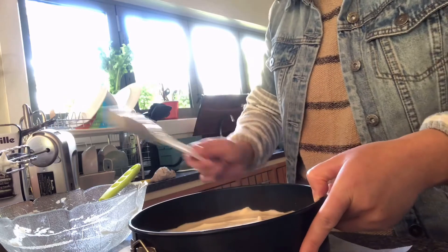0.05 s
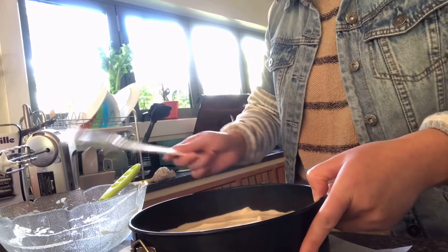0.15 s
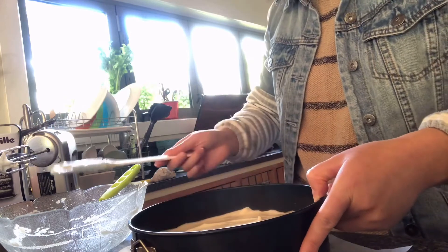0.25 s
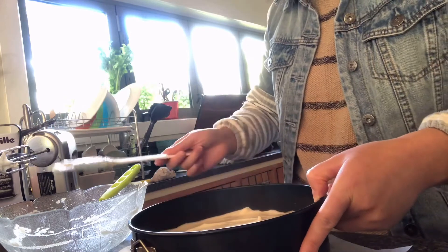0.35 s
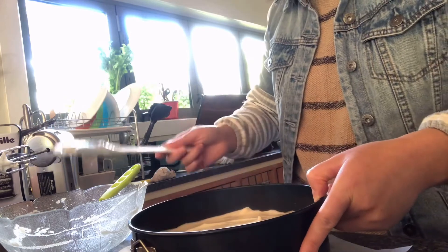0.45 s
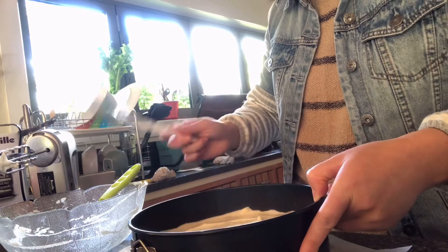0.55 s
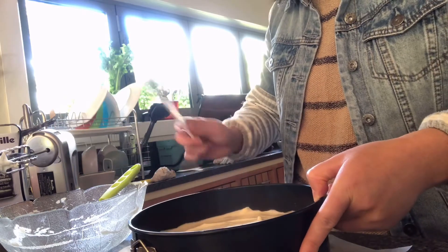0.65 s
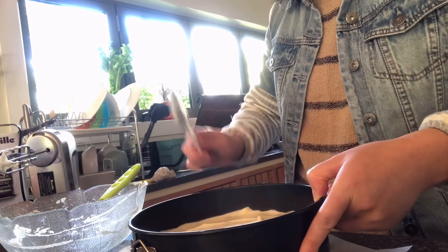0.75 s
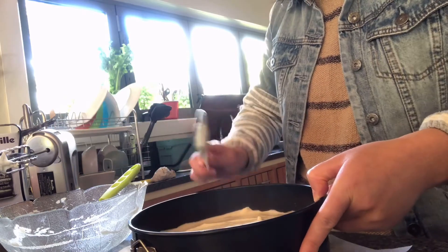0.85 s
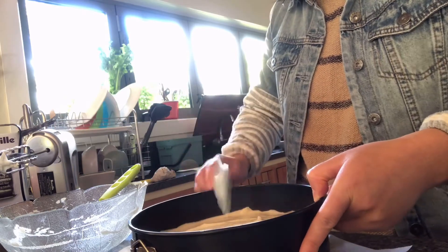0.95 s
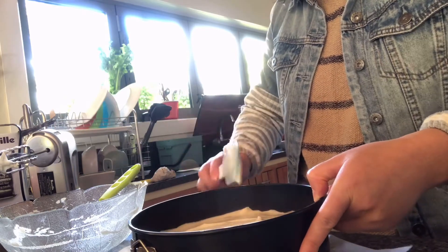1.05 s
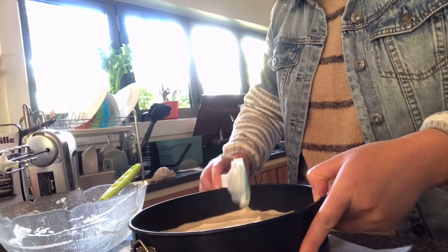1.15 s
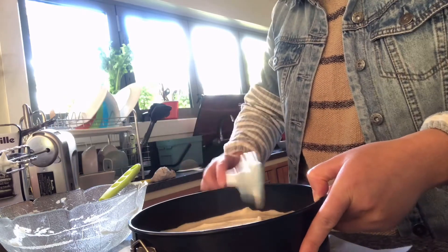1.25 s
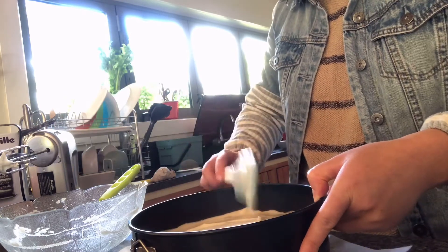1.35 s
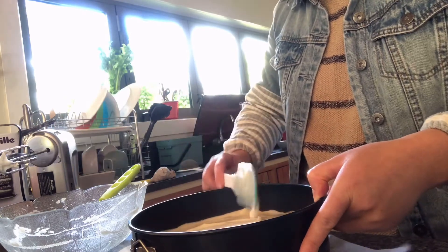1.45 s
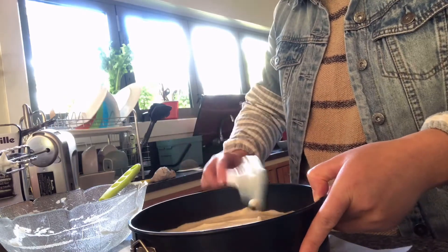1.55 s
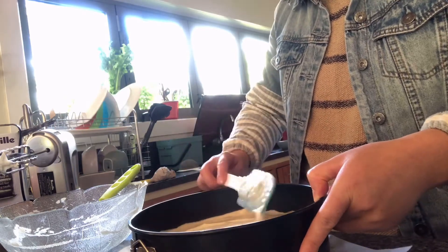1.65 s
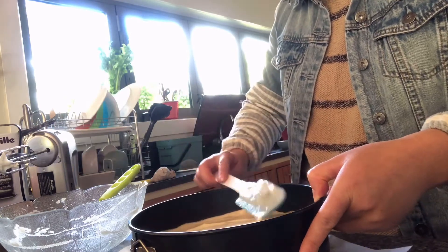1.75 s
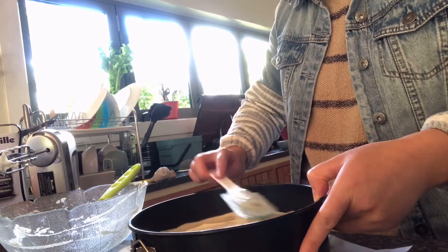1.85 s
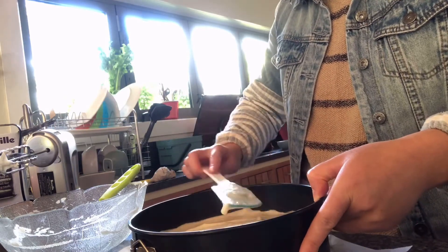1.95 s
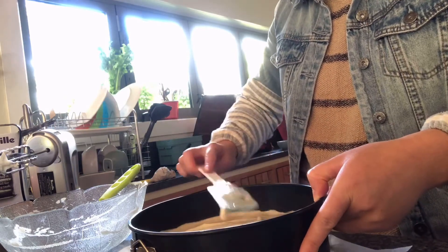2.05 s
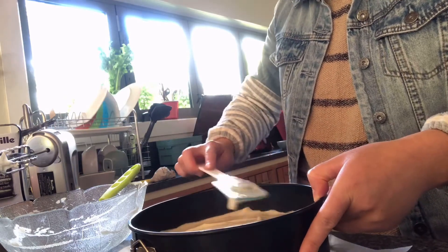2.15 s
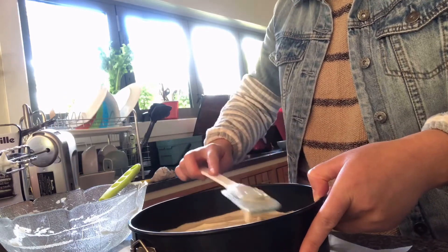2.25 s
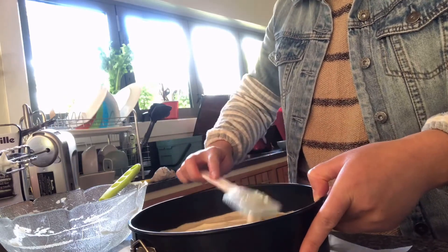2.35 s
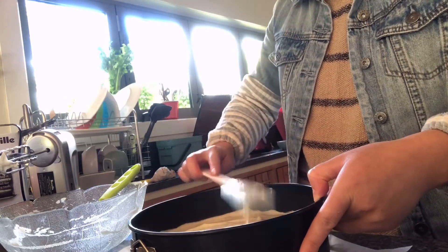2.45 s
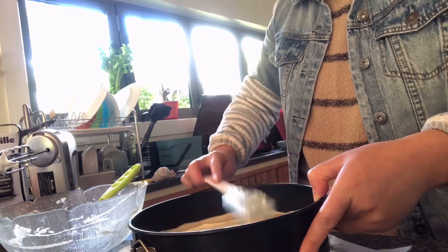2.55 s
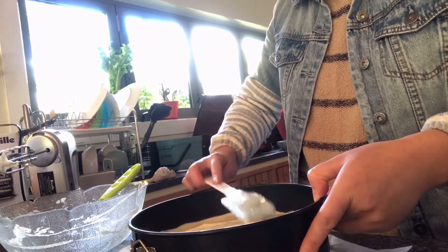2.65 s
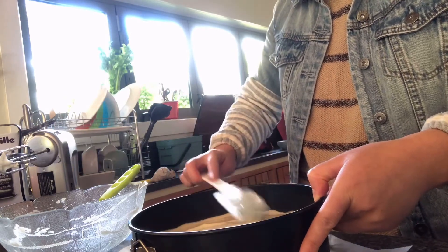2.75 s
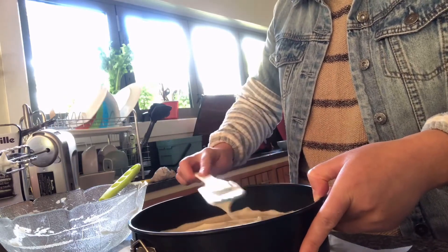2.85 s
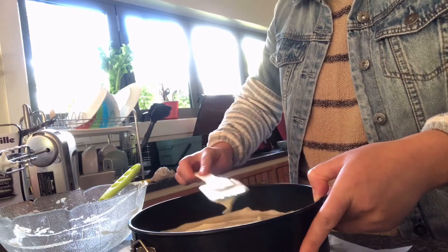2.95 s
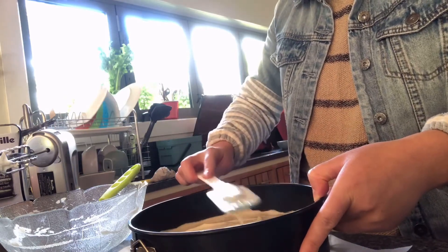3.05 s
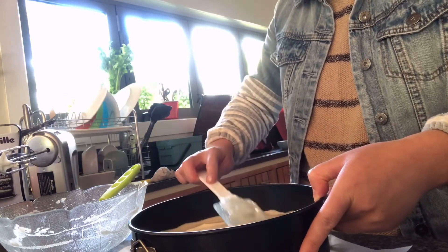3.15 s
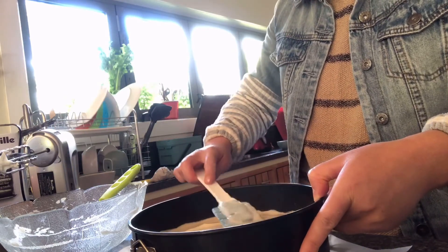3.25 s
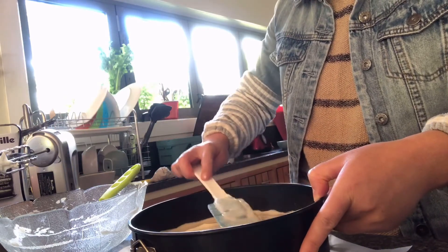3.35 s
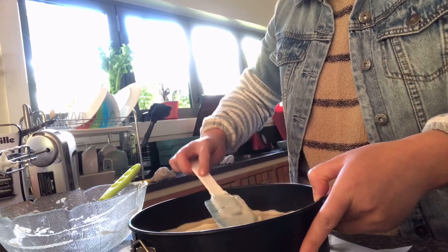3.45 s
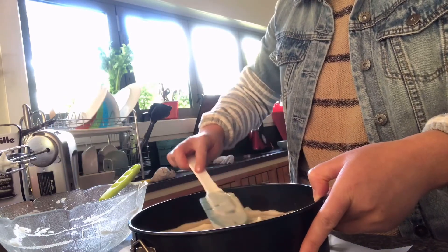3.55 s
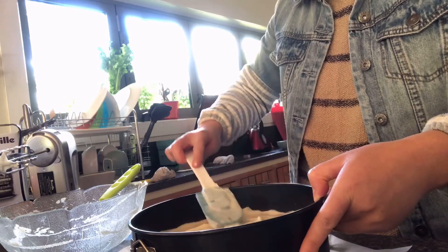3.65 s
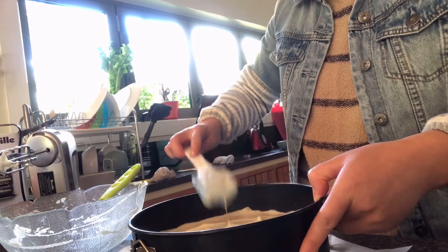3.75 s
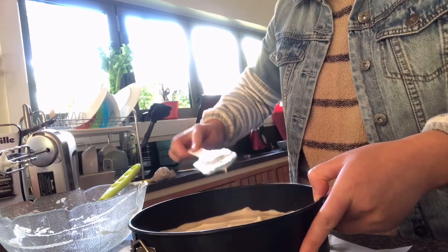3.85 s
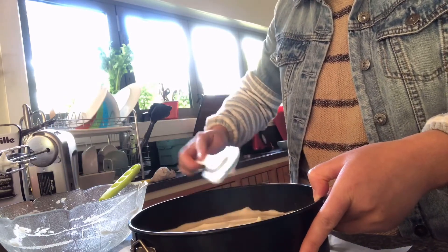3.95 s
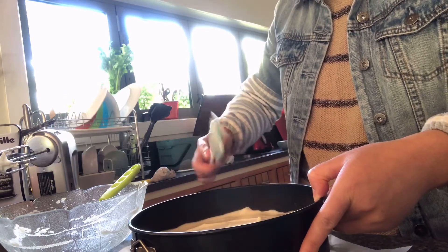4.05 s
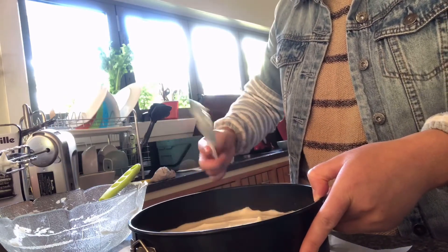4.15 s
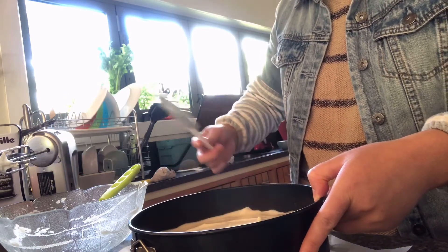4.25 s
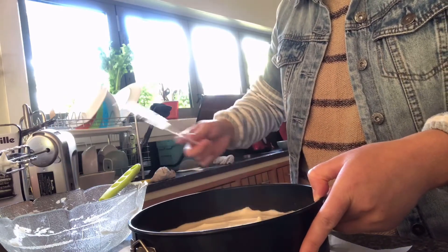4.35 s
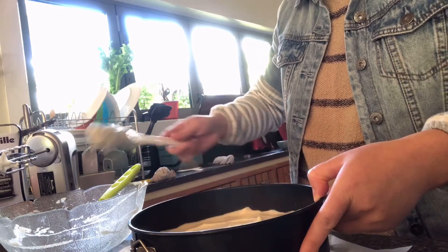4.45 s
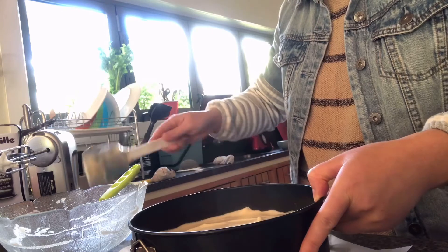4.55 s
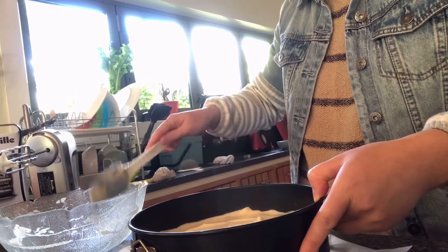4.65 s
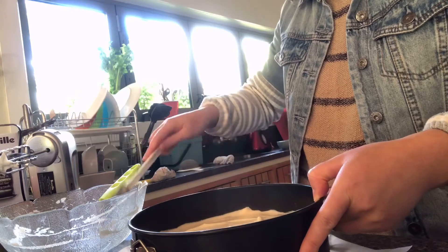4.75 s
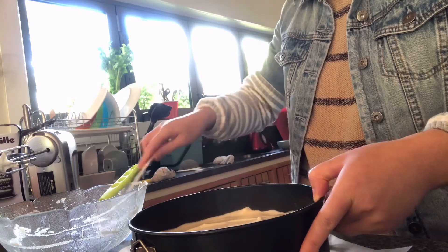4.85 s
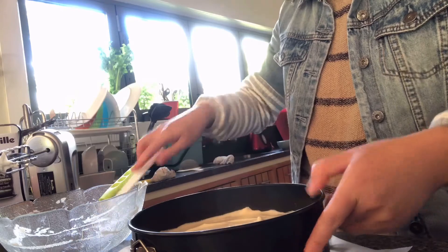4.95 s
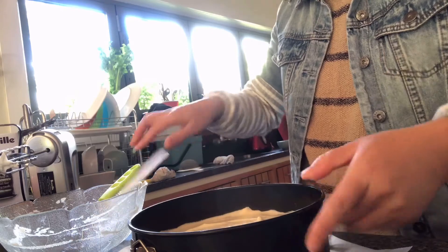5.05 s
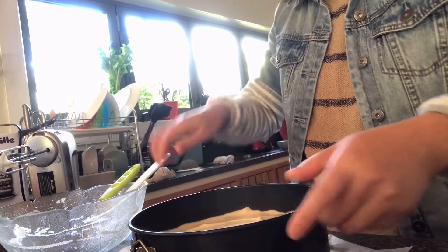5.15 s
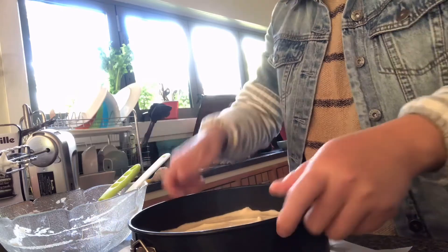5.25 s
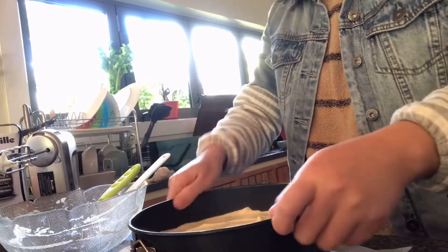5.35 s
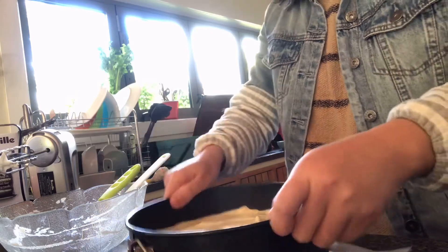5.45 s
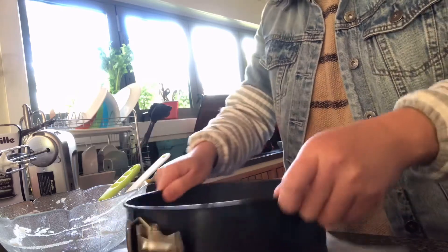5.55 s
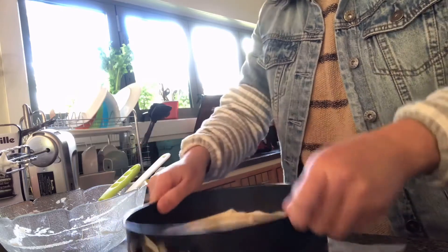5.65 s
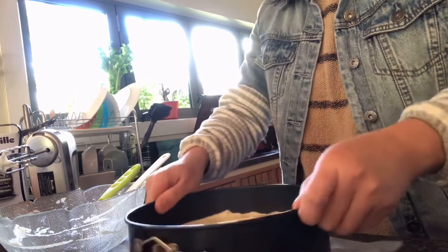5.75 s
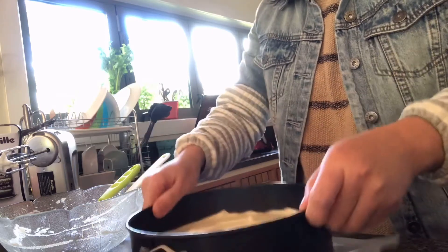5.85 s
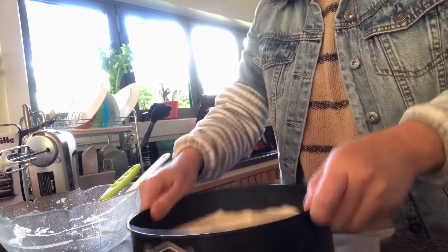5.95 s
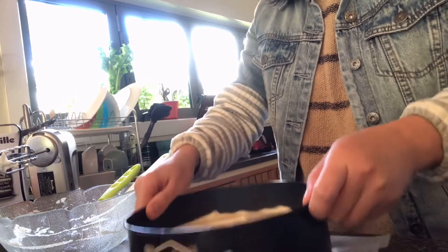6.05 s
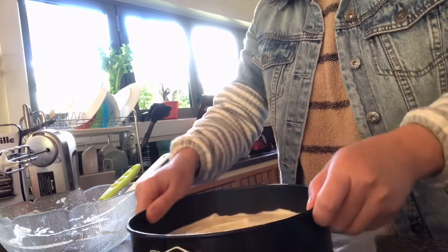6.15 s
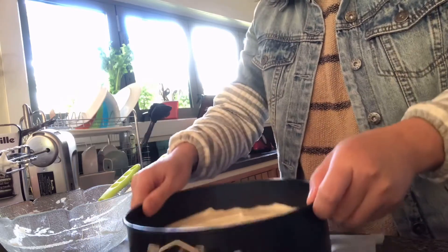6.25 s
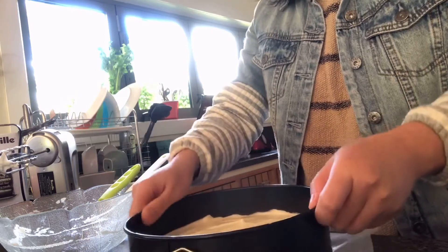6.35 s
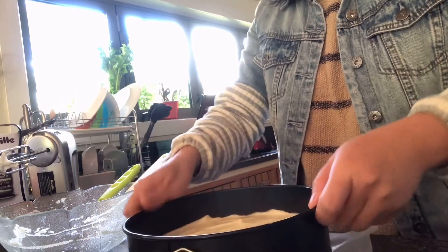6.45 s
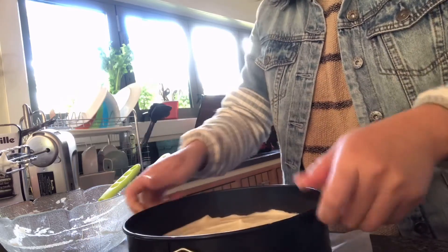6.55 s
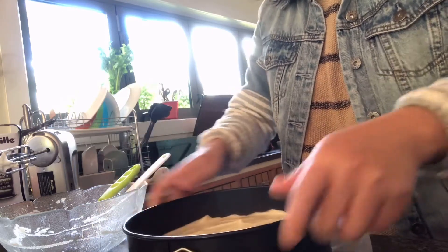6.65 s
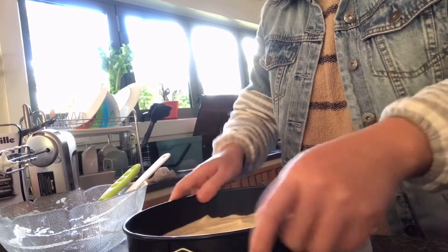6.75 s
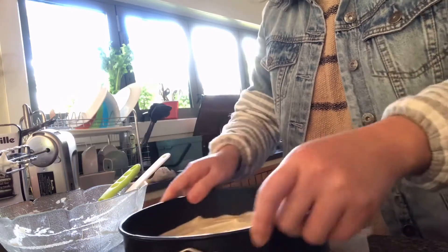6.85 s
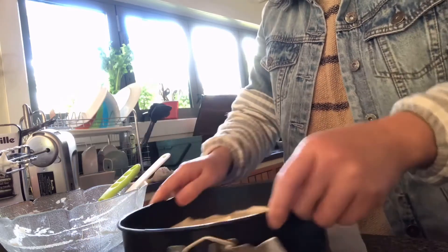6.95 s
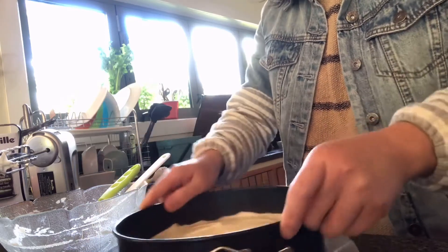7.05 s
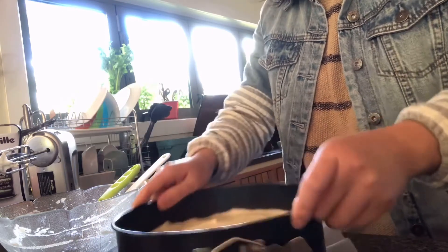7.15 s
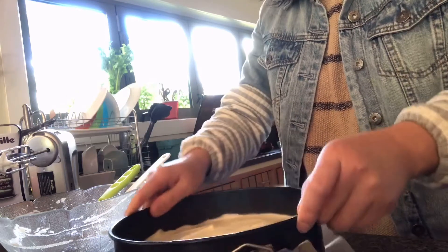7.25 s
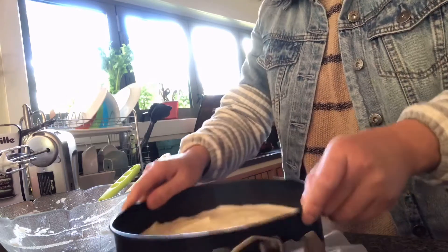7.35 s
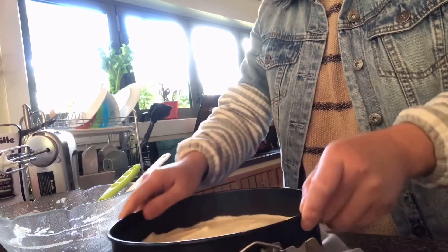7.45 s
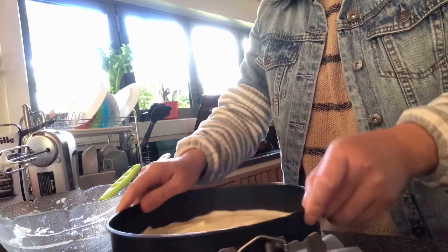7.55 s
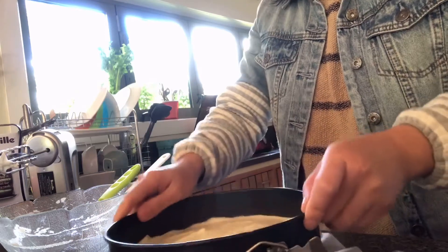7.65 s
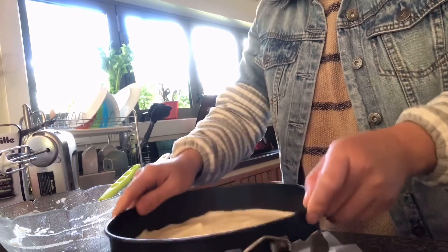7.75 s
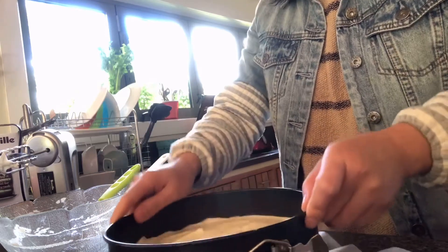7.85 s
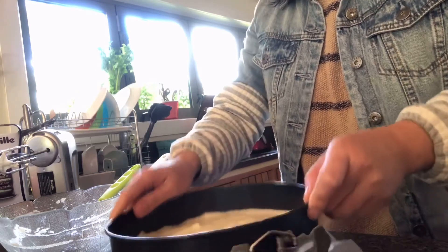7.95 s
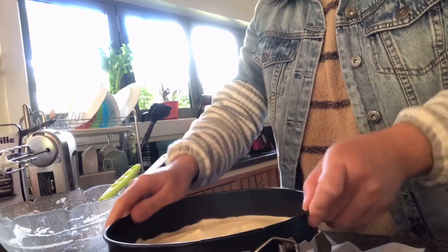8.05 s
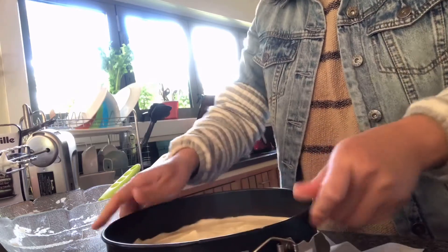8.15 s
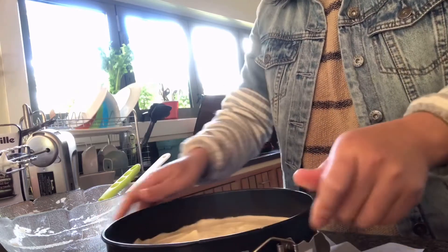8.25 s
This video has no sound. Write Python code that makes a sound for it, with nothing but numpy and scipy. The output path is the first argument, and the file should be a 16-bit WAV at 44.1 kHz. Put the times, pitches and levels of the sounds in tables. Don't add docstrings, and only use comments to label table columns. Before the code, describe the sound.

Five quick spatula taps on a batter-filled metal tin, a clink into a glass bowl, then heavy tin knocks on a worktop with crunching paper.

```python
import sys
import numpy as np
from scipy import signal
from scipy.fft import rfft, irfft, next_fast_len
from scipy.io import wavfile
from scipy.ndimage import uniform_filter1d

SR = 44100
rng = np.random.default_rng(int(sys.argv[2]) if len(sys.argv) > 2 else 0)


def volts_from_decibels(level):
    exponent = np.asarray(level, float) / 20
    return 10 ** exponent


def bounce(signal):
    frames = np.transpose(np.atleast_2d(signal))
    limited = np.clip(frames, -1, 1)
    pcm = np.round(limited * 32767).astype(np.int16)
    wavfile.write(sys.argv[1], SR, pcm)


N = 365588
M = next_fast_len(N)
HZ = np.arange(M // 2 + 1) * SR / M


# (time [s], body peak level [dB], plate level [dB], tick level [dB], hardness [dB per octave])
RIM_TAPS = [
    (0.985, -19.5, -18, -32, 10.5),
    (1.1285, -13.5, -10, -12.5, 2),
    (1.293, -14.5, -14, -15.5, 6.5),
    (1.4456, -11, -4.5, -10, 1),
    (1.5969, -16, -14, -12, 2.5),
]
BLADE_PATS = [
    (2.5455, -27.5, -24, -14, 0),
    (2.666, -32.5, -30, -20, 0),
]
# (frequency [Hz], level [dB], t60 [s])
HELD_BODY_MODES = [(273, 1, .035), (345, 2, 0.025), (386.6, -5, 0.026)]
# (frequency [Hz], level [dB], t60 [s])
RIM_MODES = [(503, -0.5, 0.036), (640, -4, .015), (775, 0.5, 0.016), (920, -2, .015), (1094, -9.5, 0.011),
             (1300, -11, .012), (1570, 1, .014), (1970, -1, .011), (2300, -13, .01), (2750, -20, .008),
             (3350, -24, .007)]
# (frequency [Hz], level [dB], t60 [s])
BLADE_MODES = [(505, -3, .025), (640, -5, .02), (1300, -12, .008), (2300, 0, .009), (2650, 0, .009),
               (3150, -2, .007), (3600, -4, .008)]


def spatula_on_tin():
    taps, contacts = blows(tap_blows(RIM_TAPS), HELD_BODY_MODES, RIM_MODES, thud_db=3.5, body_db=5,
                           knock_db=6.5, tick_db=3.0, small_hz=215, spread=0.012)
    pats, touches = blows(tap_blows(BLADE_PATS), HELD_BODY_MODES, BLADE_MODES, thud_db=3.5, body_db=4.5,
                          knock_db=6, tick_db=4.0, small_hz=200, spread=0.01)
    return bending(taps + pats) + tin_wall(contacts + touches)


def tap_blows(table):
    return [(s, body, -15.5 + 0.75 * body, plate, tick, hard) for s, body, plate, tick, hard in table]


# (time [s], body peak level [dB], thud level [dB], plate level [dB], paper level [dB])
LANDINGS = [(5.69, -17.5, -22.5, -30, -23), (5.826, -8.5, -17, -13, -17), (5.986, -4.5, -13, -13, -16),
            (6.156, -19, -13.5, 1.5, -23.5), (6.35, -6.5, -18.5, -11, -14.5),
            (7.018, -13, -14.5, -18, -25.5), (7.217, -10.5, -12, -21.5, -15), (7.409, -6, -20, -11, -18.5),
            (7.615, -9.5, -17, -6.5, -27.5), (7.811, -6.5, -21, -14.5, -23), (8.009, -20, -14, 1, -18)]
# (time [s], body peak level [dB], plate level [dB])
ROCKS = [(5.698, -28.5, -42), (5.781, -26.5, -50), (5.994, -18, -3.5), (6.169, -9, -32),
         (6.181, -29.5, -31.5), (6.507, -34, -39.5), (6.77, -41.5, -47), (6.815, -34.5, -44),
         (7.032, -9.5, -7.5), (7.051, -21, -30), (7.426, -12, -22), (7.438, -18.5, -26),
         (7.636, -11.5, -14.5), (7.825, -13, -15), (8.02, -8.5, -15)]
# (frequency [Hz], level [dB], t60 [s])
BODY_MODES = [(197, -10, 0.11), (258.6, -1, 0.054), (326, -1.5, 0.023), (377, -1.5, 0.02)]
# (frequency [Hz], level [dB], t60 [s])
BASE_MODES = [(493, -0.5, 0.085), (593.8, 6, 0.024), (794, 0.5, 0.036), (990, -3, 0.023),
              (1110, 0.5, 0.015), (1277, -5.5, 0.0297), (1587, -17, 0.042), (1814, -23, 0.047)]


def tin_on_worktop():
    rows = []
    for s, body, thud, plate, _ in LANDINGS:
        rows.append((s, body, thud, plate, plate, slap_hardness(body, plate)))
    for s, body, plate in ROCKS:
        rows.append((s, body, body - 11, plate, plate - 5, slap_hardness(body, plate)))
    knocks, _ = blows(rows, BODY_MODES, BASE_MODES, thud_db=-0.85, body_db=5.5, knock_db=5.0,
                      tick_db=-9.5, small_hz=196, spread=0.032)
    return bending(knocks)


def slap_hardness(body, plate):
    return 0.5 + 0.21 * (plate - body)


# (frequency [Hz], level [dB], t60 [s])
THUD_MODES = [(64, -20, .05), (85, 1.5, 0.075), (110, 3, 0.072)]
# (frequency [Hz], level [dB], t60 [s])
TICK_MODES = [(2630, -3, .007), (3200, -6, .006), (4150, -3, .007), (4680, -3.5, .007), (5600, -10.5, .008),
              (6050, -3, .012), (6600, -5, .012), (7600, -3.5, .01), (8500, -11, .007),
              (10500, -12, 0.0047)]


def blows(table, body_modes, plate, thud_db, body_db, knock_db, tick_db, small_hz, spread):
    thuds, tin, ticks, contacts = np.zeros((4, N))
    for s, body, thud, knock, tick, hard_db in table:
        add(thuds, s, volts_from_decibels(thud + thud_db) * ring(THUD_MODES, scatter_db=3.5, detune=0.04))
        add(tin, s, volts_from_decibels(body + body_db) * ring(body_modes, scatter_db=4.5, detune=0.03))
        add(tin, s, volts_from_decibels(knock + knock_db) * ring(harder(plate, hard_db), scatter_db=3.0, detune=spread))
        click = ring(TICK_MODES, scatter_db=1.5, detune=spread) + 0.074 * burst(0.0053)
        add(ticks, s, volts_from_decibels(tick + tick_db) * click)
        rebound = ring(TICK_MODES[:2], scatter_db=0.0, detune=0.043)
        add(ticks, s + 0.0075, volts_from_decibels(tick + tick_db - 16.0) * rebound)
        add(contacts, s, volts_from_decibels(tick) * np.ones(1))
    tin = signal.sosfilt(signal.butter(4, small_hz, "high", fs=SR, output="sos"), tin)
    ticks = signal.sosfilt(signal.butter(1, 9000, fs=SR, output="sos"), ticks)
    return thuds + tin + ticks, contacts


def bending(x):
    late_s = 0.01598 / (1 + (HZ / 125) ** 4.93) + 0.003597 / (1 + (HZ / 1500) ** 1.8)
    phase = 2 * np.pi * np.cumsum(late_s) * SR / M
    return irfft(rfft(x, M) * np.exp(-1j * phase), M)[:N]


# (frequency [Hz], width [Hz], level [dB])
WALL_MODES = [(2500, 410, 1), (4000, 450, -5), (5180, 900, -10.5), (6340, 1060, 6), (7400, 1300, -1)]


def tin_wall(contacts):
    level_db, t60_s = -30, 0.25
    t = np.arange(SR // 2) / SR
    gain = sum(volts_from_decibels(db) * hump(hz, width) ** 2 for hz, width, db in WALL_MODES)
    shimmer = noise(gain)[:len(t)] * np.exp(-np.log(1000) * t / t60_s)
    return volts_from_decibels(level_db) * signal.fftconvolve(contacts, shimmer)[:N]


# (time [s], peak level [dB])
BOWL_HITS = [
    (5.078, -48),
    (5.1, -3.5),
    (5.103, -12.5),
    (5.112, -27),
]
# (frequency [Hz], level [dB], t60 [s])
BOWL_MODES = [(300.8, -14, 0.26), (914, -8, 0.15), (1626, -5.5, .21), (2492, 0, 0.2), (2500, -0.5, 0.014),
              (3450, -3, 0.077), (4570, -11, 0.19), (4680, 6, 0.016), (5940, -17, 0.37), (7210, 6.5, .017),
              (7380, -11.5, 0.117), (8910, -2.5, 0.019), (9140, -22, .15), (10460, -5.5, 0.016)]


def bowl():
    out = np.zeros(N)
    for s, db in BOWL_HITS:
        scuff = signal.lfilter([0.3], [1, -0.75], burst(0.012))
        handle = ring([(160, -2, 0.07), (265, -0.5, 0.05), (386, -2, 0.04)], scatter_db=1, detune=0.011)
        add(out, s, volts_from_decibels(db - 12.0) * scuff)
        add(out, s + 0.0042, volts_from_decibels(db - 20.5) * handle)
        add(out, s, volts_from_decibels(db) * ring(BOWL_MODES, scatter_db=1.1, detune=0.0004, size=20000))
    return signal.sosfilt(signal.butter(2, 120, "high", fs=SR, output="sos"), out)


def paper():
    return crunching() + creaking() + sliding()


# (time [s], peak level [dB])
SNAPS = [(5.699, -13.5), (5.718, -30.5), (5.838, -23), (5.996, -13.5), (6.167, -11), (6.173, -12),
         (6.181, -17.5), (7.035, -8.5), (7.048, -13.5), (7.225, -24), (7.424, -24), (7.434, -16),
         (7.636, -16), (7.643, -13), (7.821, -21.5), (7.828, -15.5), (7.839, -23.5), (8.023, -12.5)]


def crunching():
    rows = []  # (s, dB, brightness dB, fade s)
    for s, *_, db in LANDINGS:
        rows.append((s - 0.0065, db - 6.5, -5.5, 0.014))
        rows.append((s, db, 1.1, 0.011))
    rows += [(s, db, 2.5, 0.0043) for s, db in SNAPS]
    dull, bright = np.zeros((2, N))
    for s, db, bright_db, fade_s in rows:
        cracks = burst(fade_s)
        add(dull, s, volts_from_decibels(db + 1.3) * cracks)
        add(bright, s, volts_from_decibels(db + bright_db - 5.0) * cracks)
    dull = signal.sosfilt(signal.butter(2, [1500, 7500], "band", fs=SR, output="sos"), dull)
    bright = signal.sosfilt(signal.butter(2, [5500, 15000], "band", fs=SR, output="sos"), bright)
    return dull + bright


# (time [s], peak level [dB], frequency [Hz], t60 [s])
SQUEAKS = [
    (3.69, -62, 3230, 0.032),
    (3.72, -62, 2850, 0.11),
    (6.774, -47, 1860, 0.051),
    (6.775, -56, 12500, 0.0116),
    (6.815, -35, 1950, 0.053),
    (6.814, -41, 13100, 0.027),
]
# (time [s], peak level [dB], frequency [Hz])
CREAKS = [(4.9716, -41, 3620), (5.4615, -30.5, 2830), (5.473, -38, 1950), (5.521, -28, 1700),
          (5.5877, -35.5, 1830), (5.6366, -48, 1620), (5.816, -28, 2180), (6.059, -23, 3530),
          (6.121, -40, 9040), (6.203, -34, 13200), (6.2253, -19, 10000), (6.7605, -45.5, 5960),
          (6.776, -42.5, 12370), (6.8162, -31, 1870), (6.856, -34, 3580), (7.361, -35.5, 7900),
          (7.5138, -18, 3540), (7.694, -33, 9000), (7.7186, -26, 10000), (7.7251, -22, 3700),
          (7.739, -34, 9000), (7.9162, -20, 4000)]


def creaking():
    out = np.zeros(N)
    for s, db, hz, t60 in SQUEAKS:
        add(out, s, volts_from_decibels(db) * ring([(hz, 0, t60), (1.1 * hz, -4, t60)], scatter_db=2, detune=0.003))
    for s, db, hz in CREAKS:
        t60 = 21 / hz
        tone = ring([(hz, 0, t60), (0.89 * hz, -6, t60)], scatter_db=3.5, detune=0.01)
        add(out, s, volts_from_decibels(db) * (0.87 * tone + 0.11 * burst(0.0033)))
    return out


# (peak time [s], scrape level [dB], hiss against scrape [dB],
# time to rise 20 dB [s], time to fade 20 dB [s]); only the size of the last two counts
SLIDES = [(0.244, -73, -13, .08, -0.6), (0.332, -68, -5, -0.1, -0.06), (0.684, -71, -7, -1, 0.3),
          (3.69, -61, -29, 0.15, 0.19), (4.37, -65, -19, -0.6, -1), (4.972, -53.5, -21.5, 0.09, 0.2),
          (5.45, -52, -6, 0.21, -1.7), (5.529, -40, -17, .04, .1), (5.585, -46, -12, .04, .03),
          (5.68, -45.5, -25, -0.02, 0.65), (6.775, -56, -10, .012, .06), (6.818, -48, -6, .012, .12),
          (6.876, -44, -4, .04, .22), (7.01, -42, -27, 0.16, 1.1)]
# (time [s], level [dB])
RUSTLE = [
    (5.7, -70),
    (5.9, -64),
    (6.52, -74),
    (6.59, -88),
    (6.88, -88),
    (6.98, -68),
    (7.5, -56.5),
    (7.9, -49),
    (8.16, -73),
]


def sliding():
    grain = volts_from_decibels(55 * uniform_filter1d(rng.standard_normal(N), size=300))
    hiss = unit(grain * noise(HZ / (HZ + 3500) * hump(5000, 8400)))
    scrape = unit(grain * noise(hump(1500, 900) + 0.94 * hump(680, 500) + 0.5 * hump(3400, 1000)))
    out = volts_from_decibels(-4.0) * curve(RUSTLE) * hiss
    for s, db, hiss_db, rise_s, fade_s in SLIDES:
        out = out + swell(s, db, rise_s, fade_s) * (volts_from_decibels(hiss_db) * hiss + volts_from_decibels(-6.5) * scrape)
    return out


# (frequency [Hz], t60 [s])
ROOM_T60 = [(60, 0.54), (250, 0.55), (1000, 0.5), (3000, 0.48), (8000, 0.38), (14000, .2)]
# (frequency [Hz], level [dB])
ROOM_LEVEL = [(60, -16), (150, -15.5), (300, -9.5), (1000, -8.5), (3000, -12.5), (8000, -10.5),
              (14000, -16.5)]


def room(x, steady):
    face_s, face_hz, flutter_hz = 0.011, 300, 250
    t = np.arange(SR) / SR
    echoes = 0
    for hz in 62.5 * 2.0 ** np.arange(9):
        band = noise(np.exp(-2 * np.log2(np.maximum(HZ, 1) / hz) ** 2))[:SR]
        band = band * np.exp(-np.log(1000) * t / on_log(ROOM_T60, hz)) * (1 - np.exp(-t / 0.002))
        share = np.sqrt(min(2 * hz / SR, 0.3) / np.sum(band ** 2))
        echoes = echoes + volts_from_decibels(on_log(ROOM_LEVEL, hz)) * band * share
    size = next_fast_len(N + SR)
    low = signal.sosfilt(signal.butter(2, face_hz, fs=SR, output="sos"), x)
    high = signal.sosfilt(signal.butter(2, face_hz, "high", fs=SR, output="sos"), x)
    high = signal.hilbert(high, M)[:N]
    wall = t // face_s % 8
    flutter = np.exp(1j * wandering_phase(flutter_hz))
    out = rfft(low + steady, size) * rfft(echoes, size)
    for k in range(8):
        face = np.real(high * np.roll(flutter, k * SR // 2))
        out = out + rfft(face, size) * rfft(echoes * (wall == k), size)
    return irfft(out, size)[:N]


# (frequency [Hz], level [dB per Hz])
AIR = [(25, -24), (45, -11.5), (100, -13), (170, -10.5), (250, -11), (400, -15.5), (650, -21.5),
       (1000, -24.5), (1500, -23.5), (1900, -30.5), (4500, -36.5), (8000, -42), (16000, -51.5)]
# (frequency [Hz], width [Hz], rms level [dB])
FRIDGE = [(146.6, 8, -75), (250.3, 3.4, -63), (492, 6.6, -66), (690, 12, -77.5), (1350, 30, -80.5)]


def kitchen():
    t = np.arange(N) / SR
    hum = 0
    for hz, width, db in FRIDGE:
        tone = np.cos(2 * np.pi * hz * t + wandering_phase(width))
        hum = hum + volts_from_decibels(db) * (1.26 * tone + 0.35 * noise(hump(hz, 5 * width) ** 2))
    return volts_from_decibels(-62.0) * noise(volts_from_decibels(on_log(AIR, HZ))) + hum


def ring(modes, scatter_db, detune, size=4096):
    t = np.arange(size) / SR
    hz, db, t60 = np.transpose(modes)[:, :, None]
    luck = rng.standard_normal((2, len(modes), 1))
    phase = 2 * np.pi * hz * (1 + detune * luck[0]) * t
    decay = np.exp(-np.log(1000) * t / t60)
    x = np.sum(volts_from_decibels(db + scatter_db * luck[1]) * decay * np.sin(phase), axis=0)
    return x / np.max(np.abs(x))


def harder(modes, hard_db):
    return [(hz, db + hard_db * np.log2(hz / 800), t60) for hz, db, t60 in modes]


def burst(fade_s):
    t = np.arange(4096) / SR
    cracks = rng.standard_normal(len(t)) * volts_from_decibels(0.74 * rng.exponential(size=len(t)))
    return unit(cracks) * np.exp(-t / fade_s) * (1 - np.exp(-t / 0.00062))


def noise(gain):
    spectrum = rng.standard_normal(len(HZ)) + 1j * rng.standard_normal(len(HZ))
    return unit(irfft(spectrum * gain, M)[:N])


def hump(hz, width):
    return 1 / np.sqrt(1 + (2 * (HZ - hz) / width) ** 2)


def wandering_phase(width_hz):
    return np.cumsum(rng.standard_normal(N)) * np.sqrt(2 * np.pi * width_hz / SR)


def swell(s, db, rise_s, fade_s):
    t = np.arange(N) / SR - s
    return volts_from_decibels(db - 20 * np.maximum(-t / abs(rise_s), t / abs(fade_s)))


def curve(table):
    s, db = np.transpose(table)
    return volts_from_decibels(np.interp(np.arange(N) / SR, s, db, left=-120, right=-120))


def on_log(table, hz):
    f, v = np.transpose(table)
    return np.interp(np.log(np.maximum(hz, 1)), np.log(f), v)


def unit(x):
    return x / np.sqrt(np.mean(x ** 2))


def add(out, s, x):
    i = int(round(s * SR))
    out[i:i + len(x)] += x[:N - i]


def scene():
    rattling = tin_on_worktop() + paper()
    steady = spatula_on_tin() + bowl()
    return (rattling + steady + room(rattling, steady) + kitchen())[None]


def band_limit(x):
    return signal.sosfilt(signal.butter(12, 16970, fs=SR, output="sos"), x)


def record(dry):
    x = signal.sosfilt(signal.butter(4, 56, "high", fs=SR, output="sos"), dry)
    x = signal.sosfilt(signal.ellip(8, 0.2, 60, 15800, fs=SR, output="sos"), x)
    mix = 1.61 * np.tanh(x / 1.682)
    return band_limit(mix)


dry = scene()
out = record(dry)
bounce(out)
```